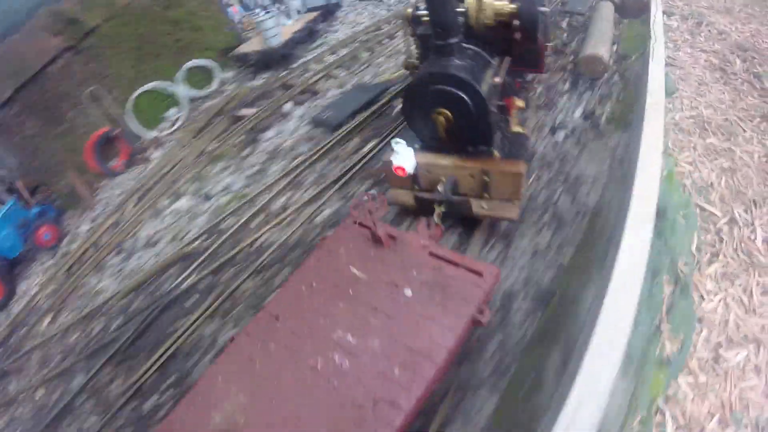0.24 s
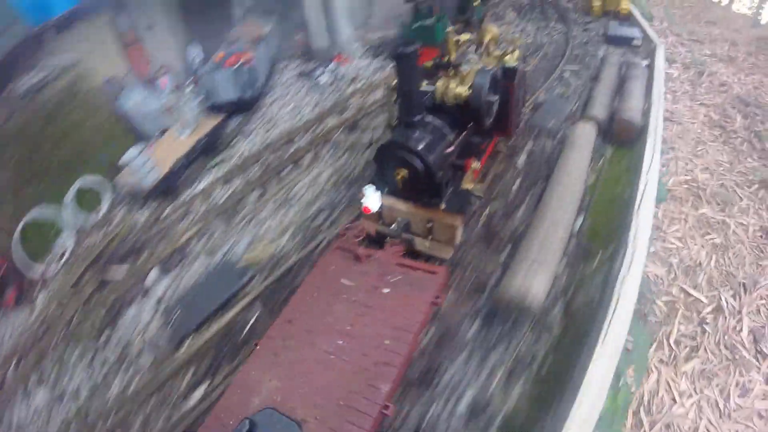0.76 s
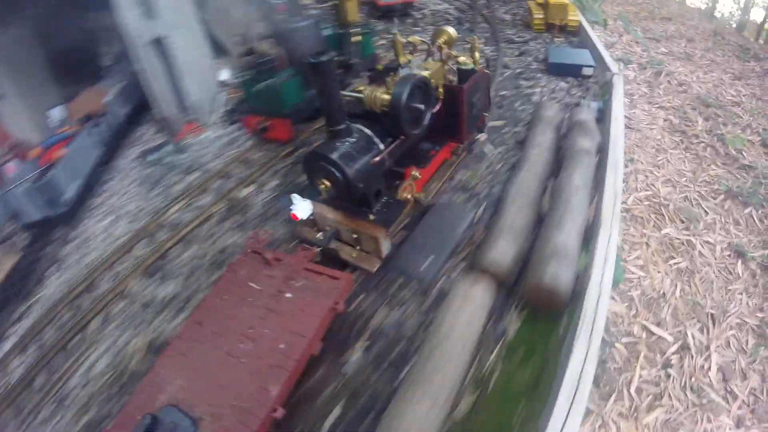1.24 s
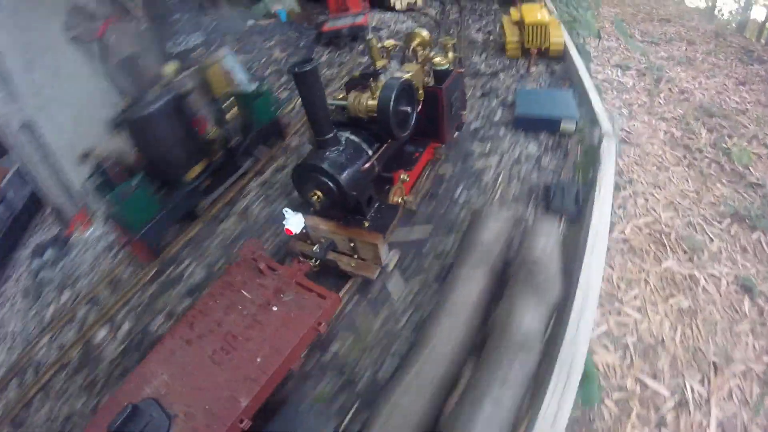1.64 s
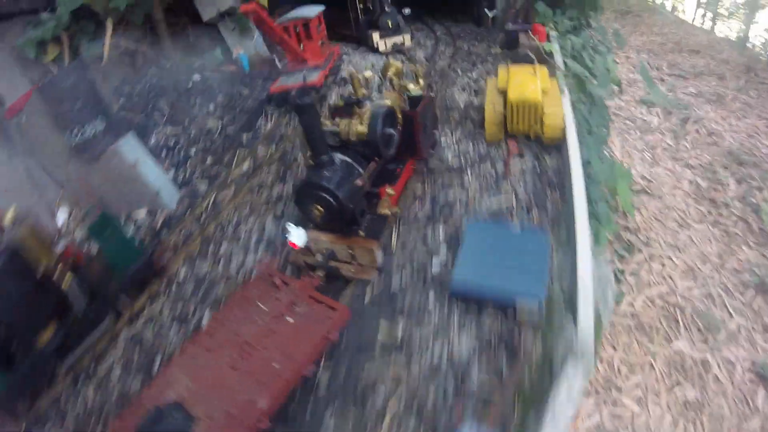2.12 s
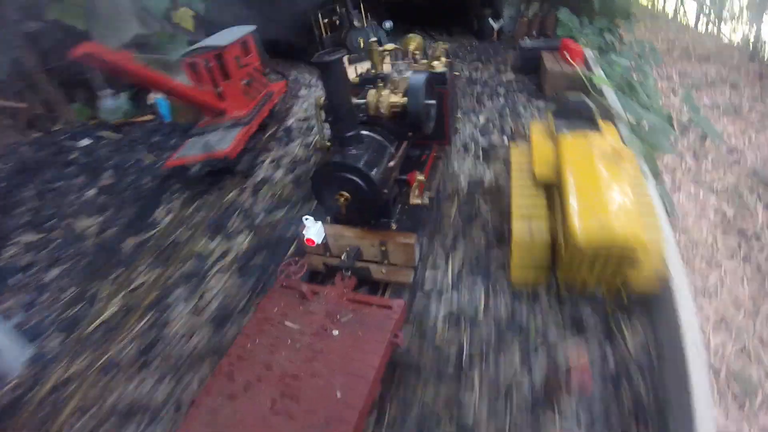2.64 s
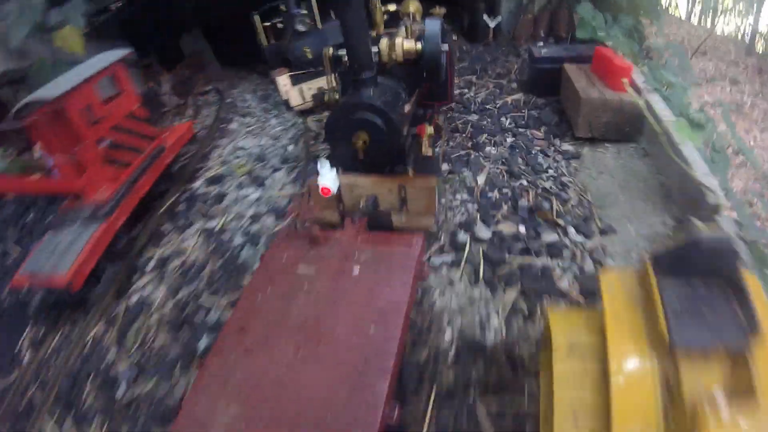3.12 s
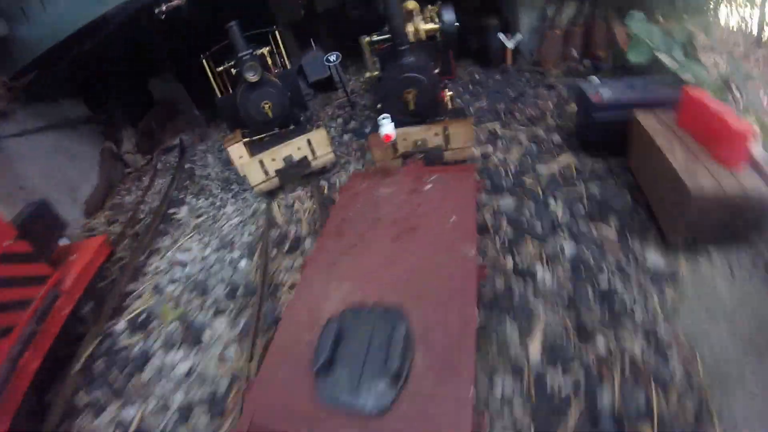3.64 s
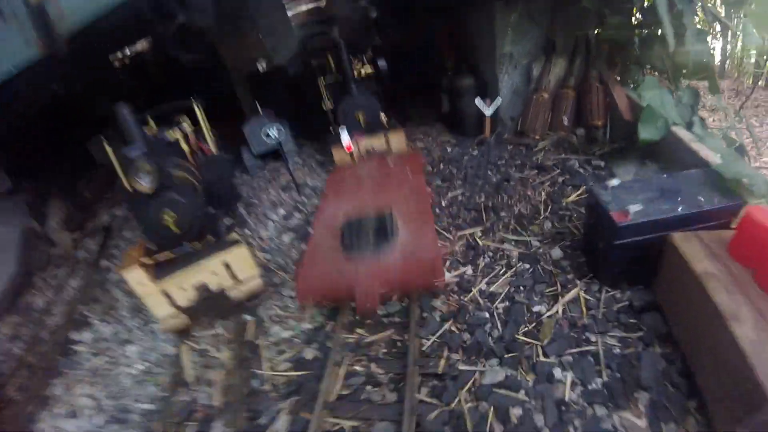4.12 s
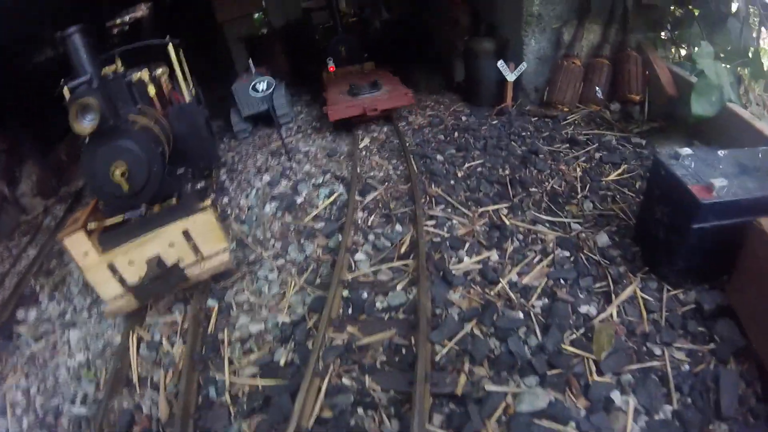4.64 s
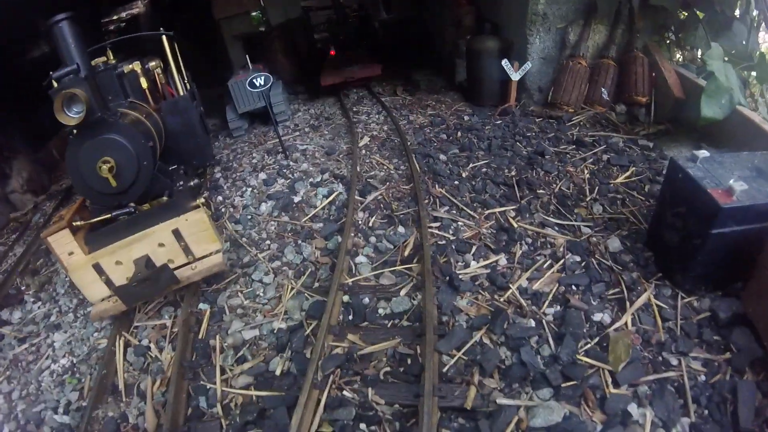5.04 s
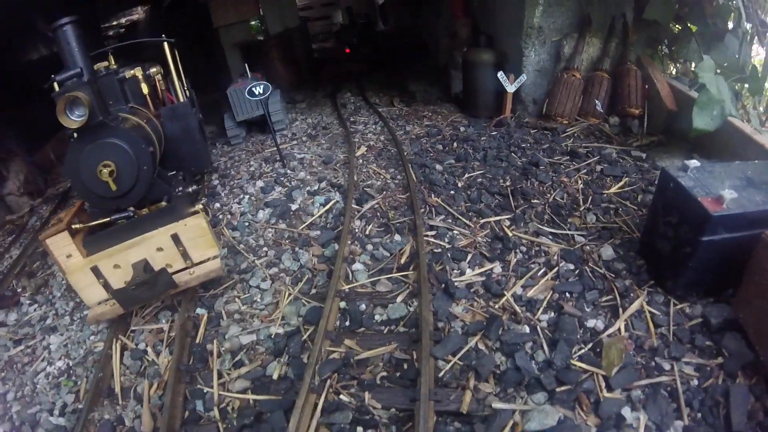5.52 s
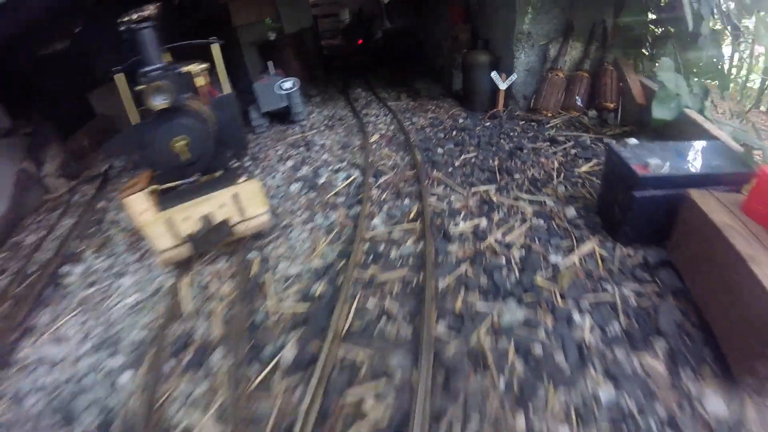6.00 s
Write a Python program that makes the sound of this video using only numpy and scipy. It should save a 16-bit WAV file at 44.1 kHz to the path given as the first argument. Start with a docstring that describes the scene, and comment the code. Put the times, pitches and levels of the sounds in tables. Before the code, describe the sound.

A small steam engine hisses in a fast, raspy buzz close by, then draws away and fades while low wind buffets the microphone.

```python
"""In a garden, a small geared steam engine runs along its track close by and draws away into a shed.
Its crank spins fast: two uneven exhaust puffs a turn chop noise into a buzz, which rings in resonances.
The ground and nearby surfaces add short, sliding echoes; the frame hums at multiples of the crank speed.
Wind buffets and scuffs the microphone, the carrying hand bumps it, and narrow gaps darken the treble."""
import sys
import numpy as np
from scipy import signal
from scipy.fft import rfft, irfft, next_fast_len
from scipy.io import wavfile
from scipy.ndimage import map_coordinates

SR = 44100
rng = np.random.default_rng(int(sys.argv[2]) if len(sys.argv) > 2 else 0)


def digitize_waveform(pressure):
    """Quantize a signal to 16-bit integers and store it at the path in sys.argv[1].

    Rows of a 2-D input are taken as channels; values are limited to [-1, 1].
    """
    field = np.atleast_2d(pressure).T
    bounded = np.clip(field, -1, 1)
    quanta = np.round(bounded * 32767).astype(np.int16)
    wavfile.write(sys.argv[1], SR, quanta)


N = 276487

# Widths of resonances below are those of one section; each section is applied twice.
# Crank speed: (time [s], speed [turns/s])
CRANK_SPEED = [(0, 32.91), (1.28, 34.14), (1.78, 33.09), (2.47, 33.54), (2.51, 32.48), (3.19, 31.22),
               (4.29, 32.77), (5.25, 30.78), (5.53, 28.94), (6.27, 29.23)]
START_TURNS = .31   # crank position at the start
# Exhaust port over one turn, at full depth: (share of turn [0-1], level [dB])
PORT_OPENING = [(0, -12), (.03, -3.5), (.1, 2), (.18, .5), (.3, -2), (.36, -7), (.45, -25), (.5, -4),
                (.575, 3), (.7, .5), (.775, -4), (.85, -12), (.95, -32), (1, -12)]
# How deeply the port chops the flow as heard: (time [s], share of full depth [0-1])
CHOP_DEPTH = [(0, 0.62), (1.5, 0.7), (3, 0.7), (4.2, 0.7), (5, 0.66), (6.27, 0.5)]
CHOP_WAVER = .06   # random share added to or taken from the depth
# Surfaces near the engine that echo for a while:
# (time of strongest echo [s], delay [ms], change of delay [ms/s], strength [0-1], length [s])
REFLECTORS = [(0.717, 1.03, -0.075, 0.2, 1.5), (2.047, 0.308, -0.0034, 1, 2.43),
              (3.747, 0.603, -0.25, 0.34, 0.92), (4.4, 1.764, -0.54, 0.4, 0.45),
              (5.048, 1.495, -0.62, 0.59, 0.67), (5.16, 0.643, -0.42, 0.4, 0.7)]
ECHO_DULL_HZ = 4830   # rough gravel scatters the treble
LEAVES_S, CLOSING_PER_S = 3.3, .22   # from then the engine draws away; decay rate of the echo delays
# Exhaust turning towards and away from the microphone:
# (time [s], body level [dB], edge level [dB], sizzle level [dB], spray level [dB])
EXHAUST_LEVELS = [(0, -30, -41.5, -39.5, -48), (0.2, -35.5, -41.5, -44.5, -44.5),
                  (.6, -35, -43, -45.5, -45), (.8, -35, -48.5, -45.5, -48), (1.2, -36.5, -49.5, -45.5, -43),
                  (1.6, -38.5, -45.5, -45, -42.5), (2.0, -39, -48.5, -46.5, -43),
                  (2.5, -39, -49, -48.5, -44), (2.9, -36, -47.5, -42.5, -43.5),
                  (3.15, -37.5, -48, -43.5, -45.5), (3.5, -39, -47, -45, -48.5),
                  (3.8, -39.5, -51.5, -47.5, -48), (4.1, -38.5, -49.5, -50, -52.5),
                  (4.2, -42, -49, -47.5, -46.5), (4.31, -39, -50, -50, -49.5),
                  (4.5, -39.5, -52, -54, -46.5), (4.63, -42, -50, -52, -50.5),
                  (4.7, -38.5, -52, -52, -51.5), (4.9, -40.5, -55, -50, -51.5),
                  (4.99, -45, -57, -51, -53.5), (5.09, -42.5, -55, -51.5, -53),
                  (5.22, -44.5, -63, -54.5, -54.5), (5.4, -44.5, -55, -55, -55.5),
                  (5.8, -46, -54.5, -56.5, -55.5), (6.2, -45.5, -60, -58, -57)]
# Wandering broad body of the hiss: (time [s], centre [Hz], width [Hz])
BODY_PATH = [(0, 2790, 483), (.7, 2810, 490), (1.3, 2785, 483), (2, 2766, 515), (2.6, 2830, 467),
             (3.1, 2730, 510), (3.5, 2800, 468), (3.95, 2880, 490), (4.2, 2730, 496), (4.35, 2770, 380),
             (4.6, 2810, 450), (4.78, 2920, 400), (4.92, 2830, 380), (5.05, 2690, 380), (5.18, 2740, 420),
             (5.4, 2750, 540), (5.8, 2800, 584), (6.27, 2700, 593)]
# Lower flank of the body: (centre [Hz], width [Hz], level [dB])
UNDERTONE = [(2279, 415, 0)]
UNDERTONE_DB = -12   # relative to the body
# Upper edge of the body: (centre [Hz], width [Hz], level [dB])
EDGE = [(3983, 440, 0)]
# Sizzle in the treble: (centre [Hz], width [Hz], level [dB])
SIZZLE = [(5000, 1120, 12.5), (6080, 560, -12.5), (4415, 114, 7)]
# Fine spray above it: (centre [Hz], width [Hz], level [dB])
SPRAY = [(6080, 595, 2.5), (8260, 1100, -11), (8890, 700, -2.5), (9597, 510, -5)]
TREBLE_FILL_DB = -13   # steady hiss under edge, sizzle and spray
# Brightest ridge of the hiss: (time [s], centre [Hz], width [Hz], level [dB])
RIDGE = [(0, 3360, 350, -26), (.2, 3340, 350, -30.5), (.6, 3254, 402, -32), (.9, 3400, 400, -35),
         (1.25, 3400, 352, -37.5), (1.6, 3430, 330, -33.5), (2.1, 3374, 355, -34), (2.5, 3366, 360, -35),
         (3.0, 3300, 380, -32.5), (3.5, 3350, 350, -33), (3.72, 3385, 280, -31), (3.95, 3395, 260, -30.5),
         (4.2, 3430, 260, -33), (4.33, 3400, 350, -42), (4.42, 3300, 260, -36.5), (4.53, 3440, 300, -35),
         (4.64, 3310, 300, -40), (4.71, 3336, 220, -30), (4.84, 3370, 280, -36), (4.9, 3330, 280, -33),
         (5.0, 3380, 240, -30), (5.08, 3390, 280, -36), (5.18, 3410, 320, -34.5), (5.28, 3430, 340, -37.5),
         (5.45, 3480, 280, -39), (5.7, 3400, 350, -40), (5.9, 3530, 400, -48), (6.05, 3360, 400, -46),
         (6.27, 3300, 400, -47)]
# Firebox and boiler: (time [s], roar level [dB], flue level [dB])
FIREBOX_LEVELS = [(0, -47.5, -57.5), (.4, -48, -52), (1.0, -51.5, -56), (1.6, -54, -54),
                  (2.1, -52.5, -55.5), (2.4, -54.5, -56), (2.8, -55.5, -50), (3.2, -56.5, -53),
                  (3.3, -55, -52), (3.45, -48, -58), (3.65, -53, -60), (3.76, -49, -61), (3.95, -49, -59.5),
                  (4.12, -52, -62), (4.25, -59, -59), (4.6, -55, -59.5), (4.9, -62, -63),
                  (5.2, -61.5, -67.5), (6.2, -62, -68.5)]
# Roar, sharper while the hand is near: (time [s], centre [Hz], width [Hz])
ROAR_PATH = [(0, 865, 234), (.6, 900, 234), (1.2, 840, 236), (2.4, 937, 234), (3, 870, 234),
             (3.3, 900, 200), (3.5, 933, 130), (3.64, 915, 170), (3.74, 830, 170), (3.86, 900, 130),
             (3.95, 970, 140), (4.12, 954, 130), (4.22, 876, 234), (5, 845, 234), (6.27, 880, 234)]
# Resonances of the flues: (centre [Hz], width [Hz], level [dB])
FLUES = [(1548, 280, 9.8), (1920, 130, 3.5), (1200, 280, 1.1)]
# Thin leak of steam at the very top: (time [s], level [dB])
LEAK_LEVEL = [(0, -58), (.9, -59), (1.65, -71), (2.4, -64), (3.6, -62.5), (4.5, -68.5), (5.2, -66),
              (6.0, -71)]
# Resonances of the leak: (centre [Hz], width [Hz], level [dB])
LEAK_MODES = [(11520, 840, -7), (12400, 570, -14), (13300, 500, -20)]
# Hum of the frame: (multiple of crank speed, middle rms level before the fade [dB])
HUM = [(4, -59), (5, -66), (6, -63), (7, -68), (12, -71), (14, -68), (16, -70)]
HUM_FADE_DB_PER_S = 2   # once the engine draws away
# Slow swell of air on the microphone: (time [s], level [dB])
BUFFET_LEVEL = [(0, -23.5), (.3, -25), (.65, -29), (1.3, -32), (1.55, -29), (1.95, -25), (2.2, -30.5),
                (2.6, -22.5), (3.1, -26.5), (3.4, -22), (3.62, -24), (3.85, -21.5), (4.05, -27), (4.5, -28),
                (4.7, -29), (5.5, -30), (6.2, -26.5)]
# Spectrum of the buffeting: (frequency [Hz], density [dB per Hz])
BUFFET_COLOUR = [(5.9, -17), (10, 9), (28, 0.5), (41, -6.5), (59, -12.5), (114, -33.5), (200, -52),
                 (260, -80), (440, -120)]
GUSTS_PER_S, GUSTS_DB = 5, 1.2   # chance gusts and lulls on top of the swell
# Rumble of wheels and garden: (time [s], level [dB])
RUMBLE_LEVEL = [(0, -48), (.9, -51), (2, -50.5), (3.3, -49), (5.0, -52), (6.2, -55)]
# Spectrum of the rumble: (frequency [Hz], density [dB per Hz])
RUMBLE_COLOUR = [(40, -5.5), (90, -2), (200, -7.5), (400, -11.5), (700, -13), (1100, -23.5), (2500, -25.5),
                 (9000, -97)]
# Bumps of the hand: (time [s], peak level [dB], length [ms], way [1 pushes in, -1 pulls out])
BUMPS = [(0.074, -20.5, 4.4, -1), (2.798, -25, 5.8, -1), (2.802, -19, 15.5, 1), (2.816, -12.5, 19, -1),
         (2.945, -26, 11, 1), (3.682, -23, 5.1, -1), (3.696, -18, 4.4, -1), (3.709, -29, 4.6, -1),
         (3.718, -30, 11, -1), (3.731, -25, 13, 1), (3.743, -21, 8, -1), (3.751, -30, 4.3, -1),
         (3.765, -16.5, 16, 1), (3.789, -29, 5.6, -1)]
# Gusts scuffing across the microphone: (start [s], attack [s], hold [s], release [s], level [dB])
SCUFFS = [(2.91, 0.02, 0.018, 0.03, -43), (3.583, 0.053, 0.056, 0.03, -42.5),
          (3.652, 0.034, 0.023, 0.05, -34), (3.699, 0.04, 0.045, 0.033, -33.5)]
# Spectrum of a scuff: (frequency [Hz], density [dB per Hz])
SCUFF_COLOUR = [(30, -6), (70, -9), (150, -4.5), (250, -11), (400, -17), (650, -23), (1000, -37),
                (5000, -100)]
SCUFF_EDGE_DB = 26   # depth from which a scuff rises and to which it falls
SCUFF_LUMPS_PER_S, SCUFF_LUMPS_DB = 70, 4   # a scuff is lumpy
# Narrow dark gaps in the treble: (centre [Hz], width [Hz], level [dB])
TREBLE_GAPS = [(7110, 230, -16), (10670, 890, -39), (10900, 800, -43)]
TOP_CUT_HZ = 14000   # 60 dB down from here up


def from_db(db):
    """Gain of a level in dB."""
    return 10 ** (np.asarray(db) / 20)


def rms_one(x):
    """Scaled to rms 1."""
    return x / np.sqrt(np.mean(x ** 2) + 1e-20)


def in_time(rows):
    """Each column of a curve over time, one value per sample."""
    s, *columns = np.transpose(rows)
    return [np.interp(np.arange(N) / SR, s, column) for column in columns]


def drift(rate):
    """Smooth chance wandering at about this rate per second; spread about 1."""
    knots = rng.standard_normal(int(N / SR * rate) + 4)
    return map_coordinates(knots, [1 + np.arange(N) / SR * rate], order=3)


def coloured(spectrum):
    """Noise with the given spectrum; rms 1."""
    hz, level_db = np.transpose(spectrum)
    size = next_fast_len(N)
    log_hz = np.log(np.arange(size // 2 + 1) * SR / size + 1e-3)
    shape = from_db(np.interp(log_hz, np.log(hz), level_db))
    return rms_one(irfft(rfft(rng.standard_normal(size)) * shape, size)[:N])


def resonator(gain, r, hz):
    """One second-order resonance with pole radius r."""
    return [gain, 0, -gain, 1, -2 * r * np.cos(2 * np.pi * hz / SR), r * r]


def resonances(x, modes):
    """Parallel resonances, each applied twice for steep skirts, signs alternating; rms 1."""
    out = 0
    for k, (hz, width_hz, level_db) in enumerate(modes):
        r = np.exp(-np.pi * width_hz / SR)
        section = resonator((1 - r * r) / 2, r, hz)
        out = out + (-1) ** k * from_db(level_db) * signal.sosfilt([section, section], x)
    return rms_one(out)


def moving_resonance(x, hz, width_hz):
    """A double resonance whose centre and width follow curves, block by block; rms 1."""
    out, state = np.zeros(N), np.zeros((2, 2))
    radius = np.exp(-np.pi * np.clip(width_hz, 40, 2000) / SR)
    for i in range(0, N, 512):
        r = radius[i]
        gain = (1 - r * r) ** .75   # keeps loudness even as the width changes
        section = resonator(gain, r, hz[i])
        out[i:i + 512], state = signal.sosfilt([section, section], x[i:i + 512], zi=state)
    return rms_one(out)


def puffs(turns, uneven_db, late_turns):
    """Steam flow through the port; each half turn has a chance strength and timing of its own."""
    half_turns = (2 * turns).astype(int)
    chance = rng.standard_normal((half_turns[-1] + 2, 2))
    middle = 2 * turns - .5
    strength, shift = (np.interp(middle, np.arange(len(chance)), c) for c in chance.T)
    share, opening_db = np.transpose(PORT_OPENING)
    depth = in_time(CHOP_DEPTH)[0] * (1 + CHOP_WAVER * drift(rate=10.0))
    opening = np.interp((turns + late_turns * shift) % 1, share, opening_db)
    return from_db(depth * opening + uneven_db * strength)


def echo(x, delay_ms, strength):
    """A copy of the sound, late by a changing delay: the path to a surface and back changes."""
    late = map_coordinates(x, [np.arange(len(x)) - delay_ms * SR / 1000], order=3)
    return np.clip(strength, 0, 1) * late


def surroundings(jet):
    """Direct sound, dull close echoes that swell and fade, and faint wavering ones from passing objects."""
    low_pass = signal.butter(2, ECHO_DULL_HZ, fs=SR, output="sos")
    dull = signal.sosfiltfilt(low_pass, jet)
    heard, t = jet.copy(), np.arange(N) / SR
    for s, delay_ms, ms_per_s, strength, length in REFLECTORS:
        near = abs(t - s) < 1.5 * length
        since = t[near] - s
        swell = strength * np.exp(-.5 * (2 * since / length) ** 2)
        heard[near] += echo(dull[near], np.maximum(delay_ms + ms_per_s * since, 0), swell)
    closing = np.exp(-CLOSING_PER_S * np.maximum(t - LEAVES_S, 0))
    for delay_ms in (1.5, 2.5, 4.0, 6.2):
        wandering_ms = delay_ms * closing * (1 + 0.07 * drift(rate=2.5))
        heard += echo(dull, wandering_ms, 0.12 + 0.07 * drift(rate=3.0))
    return heard


def blast(heard, steady):
    """Hiss of the exhaust jet: broad body, edge, sizzle, spray and a bright wandering ridge."""
    body_db, *treble_db = in_time(EXHAUST_LEVELS)
    # the moving body is opposite in sign to its neighbours, so they blend without hollows
    undertone = from_db(UNDERTONE_DB) * resonances(heard, UNDERTONE)
    body = undertone - moving_resonance(heard, *in_time(BODY_PATH))
    out = from_db(body_db) * body
    filled = heard + from_db(TREBLE_FILL_DB) * steady
    for level_db, modes in zip(treble_db, (EDGE, SIZZLE, SPRAY)):
        out = out + from_db(level_db) * resonances(filled, modes)
    ridge_hz, ridge_width_hz, ridge_db = in_time(RIDGE)
    return out + from_db(ridge_db) * moving_resonance(heard, ridge_hz, ridge_width_hz)


def firebox(heard, steady):
    """Puffs and the steady burner ring in a moving roar and in the fixed resonances of the flues."""
    roar_db, flue_db = in_time(FIREBOX_LEVELS)
    roar = moving_resonance(heard + from_db(0.5) * steady, *in_time(ROAR_PATH))
    flues = resonances(heard + from_db(-21.0) * steady, FLUES)
    return from_db(roar_db) * roar + from_db(flue_db) * flues


def leak(heard, steady):
    """Thin steam leak: puffs and steady hiss in resonances at the very top."""
    return from_db(in_time(LEAK_LEVEL)[0]) * resonances(heard + from_db(-3.0) * steady, LEAK_MODES)


def exhaust(turns):
    """Turbulent steam gated by the port, echoed, then rung in the resonances."""
    flow = puffs(turns, uneven_db=0.96, late_turns=0.0034)
    # wet steam sputters: the flow flickers within each puff
    sputter_db = rms_one(signal.lfilter([1], [1, -.97], rng.standard_normal(N)))
    heard = surroundings(flow * from_db(sputter_db) * rng.standard_normal(N))
    # burner and leaks blow steadily and fill the gaps between the puffs
    steady = rng.standard_normal(N)
    return blast(heard, steady) + firebox(heard, steady) + leak(heard, steady)


def hum(turns):
    """The frame hums at multiples of the crank speed, wavering, and fades as the engine leaves."""
    away_s = np.maximum(np.arange(N) / SR - LEAVES_S, 0)
    tones = 0
    for multiple, level_db in HUM:
        level = np.sqrt(2) * from_db(level_db + 3.9 * drift(rate=5.0))   # rms to peak
        tones = tones + level * np.sin(2 * np.pi * multiple * turns + 0.35 * drift(rate=6.0))
    return from_db(-HUM_FADE_DB_PER_S * away_s) * tones


def wind_buffet():
    """Air pressing on the microphone: deep noise with a slow swell and chance gusts."""
    level_db = in_time(BUFFET_LEVEL)[0] + GUSTS_DB * drift(GUSTS_PER_S)
    return from_db(level_db) * coloured(BUFFET_COLOUR)


def rumble():
    """Wheels and garden: low coloured noise whose level follows a slow curve."""
    return from_db(in_time(RUMBLE_LEVEL)[0]) * coloured(RUMBLE_COLOUR)


def hand_bumps():
    """Each bump moves the diaphragm once, in or out, as a rounded pulse."""
    t = np.arange(N) / SR
    out = np.zeros(N)
    for s, peak_db, length_ms, way in BUMPS:
        spread_s = length_ms / 1000 / 4
        out += way * from_db(peak_db) * np.exp(-.5 * ((t - s) / spread_s) ** 2)
    return out


def scuffs():
    """Rough edge of the gusts: lumpy noise with attack, hold and release straight in dB."""
    t = np.arange(N) / SR
    level = np.zeros(N)
    for *times, level_db in SCUFFS:
        corners_db = [-SCUFF_EDGE_DB, 0, 0, -SCUFF_EDGE_DB]
        # start and durations add up to the corner times; practically silent outside
        level += from_db(level_db + np.interp(t, np.cumsum(times), corners_db, -200, -200))
    lumps = from_db(SCUFF_LUMPS_DB * drift(SCUFF_LUMPS_PER_S))
    return level * lumps * coloured(SCUFF_COLOUR)


def scene():
    """Engine, garden, wind and hand at one microphone."""
    turns = START_TURNS + np.cumsum(in_time(CRANK_SPEED)[0]) / SR
    engine = exhaust(turns) + hum(turns)
    return (engine + wind_buffet() + rumble() + hand_bumps() + scuffs())[None]


def record(dry):
    """Notches leave narrow dark gaps in the treble, then a steep low-pass cuts the top."""
    for hz, width_hz, depth_db in TREBLE_GAPS:
        middle = -2 * np.cos(2 * np.pi * hz / SR)
        wide = np.tan(np.pi * width_hz / SR)
        left = wide * from_db(depth_db)   # what remains at the centre
        dry = signal.lfilter([1 + left, middle, 1 - left], [1 + wide, middle, 1 - wide], dry)
    return signal.sosfilt(signal.cheby2(20, 60, TOP_CUT_HZ, fs=SR, output="sos"), dry)


dry = scene()
out = record(dry)
digitize_waveform(out)
```